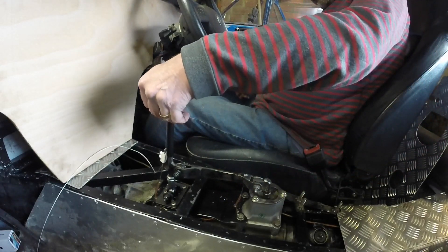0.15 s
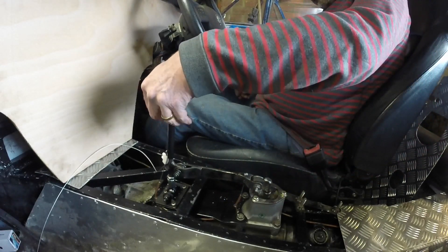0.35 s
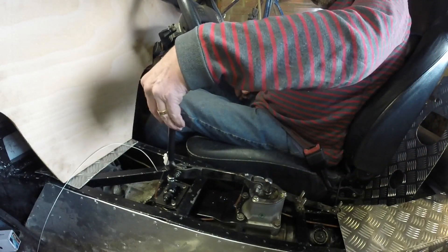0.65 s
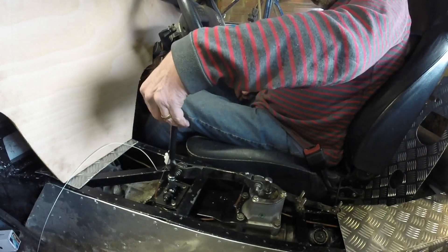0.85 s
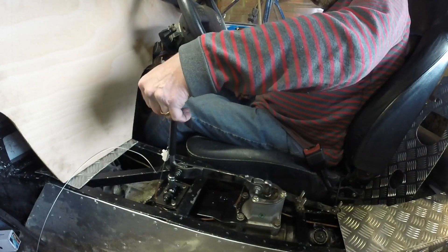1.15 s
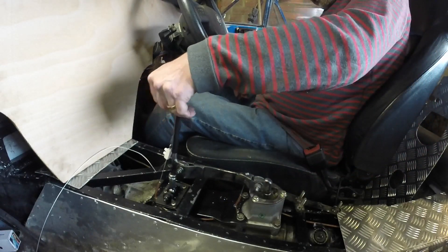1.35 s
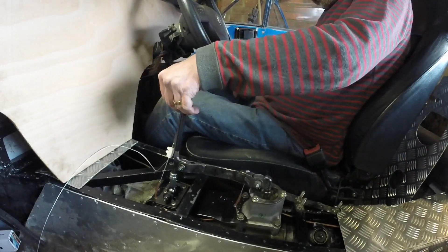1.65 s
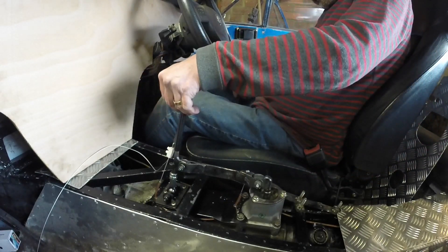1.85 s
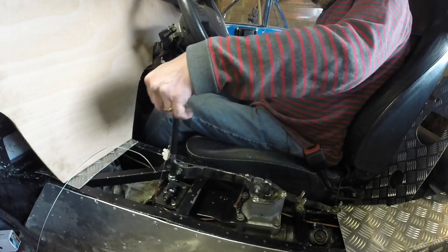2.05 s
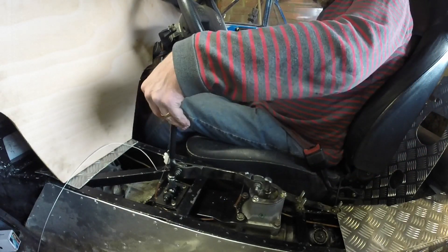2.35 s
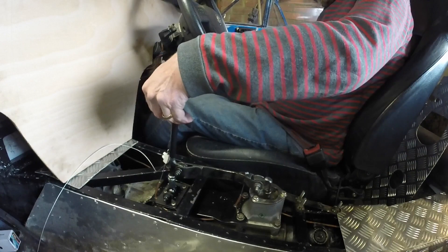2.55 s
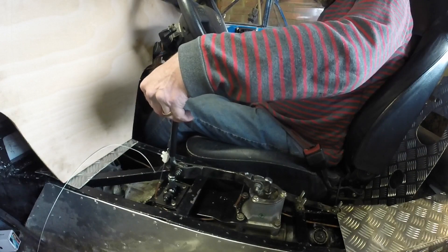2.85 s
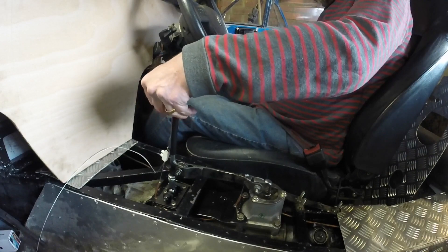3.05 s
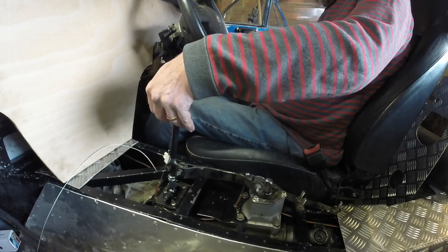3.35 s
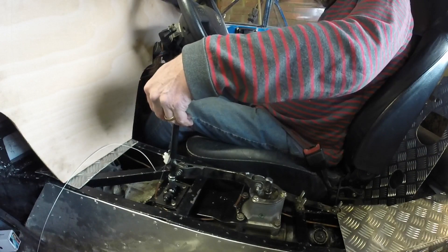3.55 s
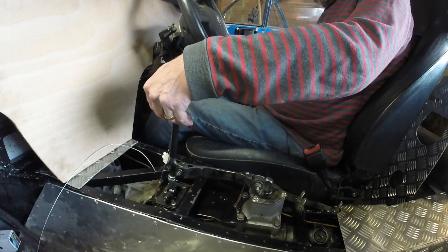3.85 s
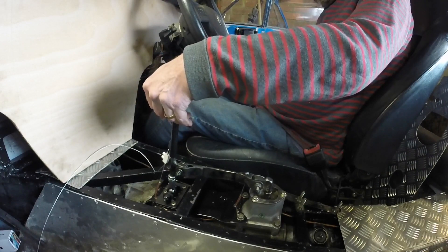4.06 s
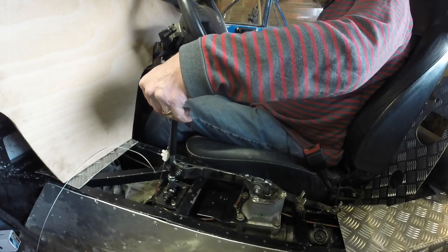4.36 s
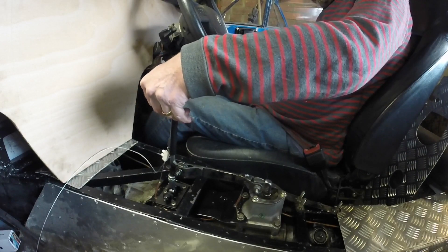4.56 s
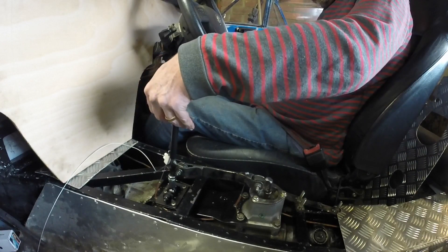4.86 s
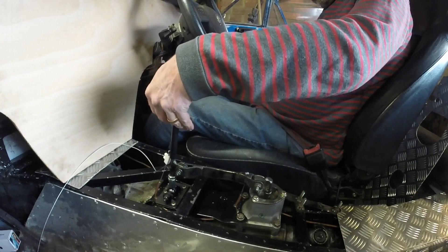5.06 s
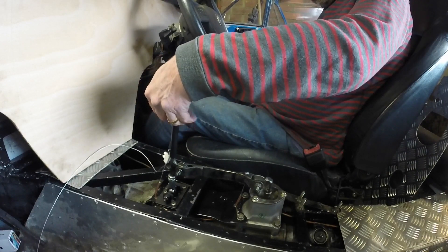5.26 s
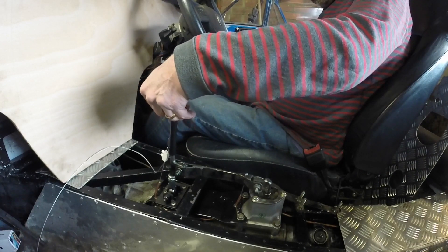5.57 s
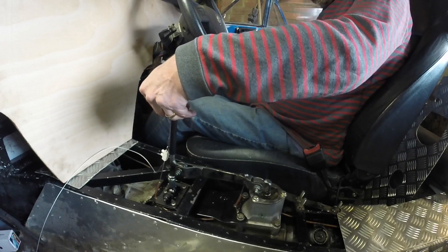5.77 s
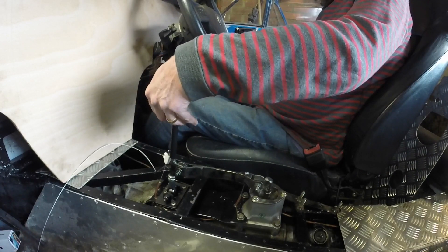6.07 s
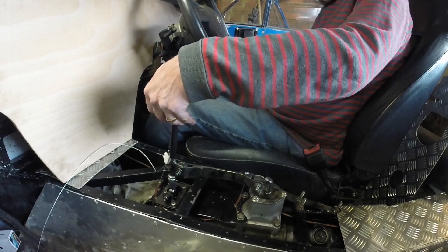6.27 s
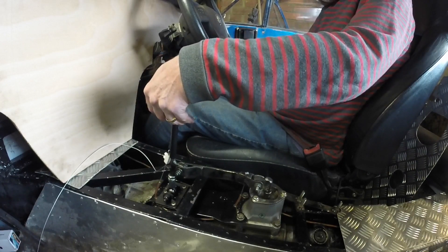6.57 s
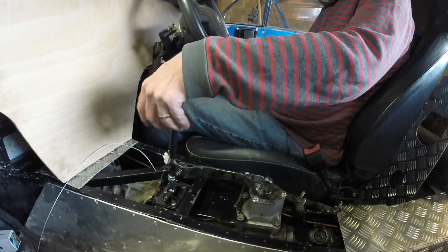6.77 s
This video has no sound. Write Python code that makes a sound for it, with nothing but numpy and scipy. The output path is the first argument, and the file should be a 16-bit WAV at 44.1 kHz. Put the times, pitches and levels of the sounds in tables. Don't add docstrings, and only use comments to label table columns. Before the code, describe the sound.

A car gear lever is worked by hand: metallic clacks, short scraping linkage strokes and deep booming floor thuds in a quiet workshop.

```python
import sys
import numpy as np
from scipy import signal
from scipy.fft import rfft, irfft, next_fast_len
from scipy.io import wavfile
from scipy.ndimage import uniform_filter1d

SR = 44100
rng = np.random.default_rng(int(sys.argv[2]) if len(sys.argv) > 2 else 0)


def dump(signal):
    limited = np.clip(np.atleast_2d(signal).T, -1, 1)
    pcm = np.round(limited * 32767).astype(np.int16)
    wavfile.write(sys.argv[1], SR, pcm)


def level_to_linear(level):
    exponent = np.asarray(level, float) / 20
    return 10 ** exponent


N = 305127


def peak_one(x):
    return x / (np.max(np.abs(x)) + 1e-12)


def add(track, piece, s):
    at = round(s * SR)
    track[at:at + len(piece)] += piece[:len(track) - at]


def ring(force, hz, t60):
    r = level_to_linear(-60 / (t60 * SR))
    w = 2 * np.pi * hz / SR
    return signal.lfilter([0, np.sin(w)], [1, -2 * r * np.cos(w), r * r], force + 1e-18)


def body(force, modes, spread_db, scatter=True):
    chance = rng.standard_normal((len(modes), 2))
    sides = np.sign(chance[:, 1]) if scatter else np.ones(len(modes))
    out = 0
    for (hz, db, t60), c, side in zip(modes, chance[:, 0], sides):
        out = out + side * level_to_linear(db + spread_db * c) * ring(force, hz, t60)
    return out


def crowd(low_hz, high_hz, t60, count):
    ratio = high_hz / low_hz
    return [(low_hz * ratio ** ((k + u) / count), 0, t60) for k, u in enumerate(rng.random(count))]


# f/Hz, level/dB
AIR_COLOUR = [(12, -59), (20, -16.5), (48, 6.5), (70, 0.5), (130, -4), (198, -9), (759, -15), (976, -17),
              (3340, -25.5), (6360, -32), (12100, -42.5), (14700, -45.5), (16000, -70)]


def air(level_db=-53):
    size = next_fast_len(N)
    hz = np.maximum(np.arange(size // 2 + 1) * SR / size, 1)
    f, db = np.array(AIR_COLOUR).T
    colour = level_to_linear(np.interp(np.log(hz), np.log(f), db))
    noise = irfft(rfft(rng.standard_normal(size)) * colour, size)[:N]
    return level_to_linear(level_db) * noise / np.std(noise)


def shop(x, t60_s=0.54, wall_cut_hz=2770):
    out = np.zeros(N)
    dull = np.exp(-2 * np.pi * wall_cut_hz / SR)
    lags = (rng.uniform(.006, .03, 12) * SR).astype(int)
    for k, lag in enumerate(lags):
        loop, state = x.copy(), [0.]
        gain = level_to_linear(-60 * lag / SR / t60_s)
        for i in range(lag, N, lag):
            back, state = signal.lfilter([gain * (1 - dull)], [1, -dull], loop[i - lag:i], zi=state)
            loop[i:i + lag] += back[:N - i]
        out += (loop - x) * (-1) ** k
    for lag in (47, 113):
        gap = np.zeros(lag - 1)
        out = signal.lfilter(np.r_[-.6, gap, 1], np.r_[1, gap, -.6], out + 1e-18)
    return out


# f/Hz, level/dB, t60/s
ROD_MODES = [(2945, 0, .06), (3030, -8, .08), (3165, -3, .07), (3260, -4, .09), (3420, -5, .09),
             (3600, -8, .08), (3725, -6, .08), (3840, -4, .08), (4040, -8, .07), (4156, -8, .07),
             (4300, -10, .07), (4640, -9, .06)]
TUNNEL_MODES = [(555, 2.5, 0.06), (601, 4.5, 0.08), (698.5, 2, 0.12), (760, -6, 0.089), (892, -2, 0.12),
                (997, -9, 0.07), (1116, -10, 0.05), (1366, 2, 0.03)]
GATE_MODES = [(1672, -6, 0.096), (1944, -8.5, 0.13), (2090, -9.5, 0.2), (2253, 8, 0.019), (2360, -3, 0.052),
              (2558, 2.5, 0.05)]
# t/s of greatest speed, length/ms, level/dB, tunnel share/dB
STROKES = [(.421, 54, -45.5, -3), (.976, 52, -50, -1), (1.158, 94, -43.5, -6), (1.327, 20, -68, -15),
           (1.468, 67, -57, 6.5), (2.085, 90, -51, 0), (2.15, 118, -40, -2.5), (2.221, 40, -69, 4),
           (2.295, 82, -41.5, -5.5), (2.978, 93, -52.5, -3), (3.176, 30, -61, -16),
           (3.278, 61, -45.5, -3.5), (3.46, 68, -43, -5.5), (4.27, 61, -58, -5.5), (4.366, 67, -51.5, -16),
           (4.727, 77, -41.5, -1), (5.328, 32, -52.5, -9), (5.603, 66, -51.5, -5), (5.693, 51, -54, -1.5),
           (6.021, 88, -46.5, 1), (6.501, 36, -60, -16), (6.64, 48, -58.5, 3), (6.908, 27, -46, 4)]


def slides(grains_per_s=4000, damping=0.17, bright_db=-6.5, pins_db=-8):
    out, t_ms = np.zeros(N), np.arange(8000) / SR * 1000
    for fastest, length_ms, db, dull_db in STROKES:
        rise_ms = .45 * length_ms
        speed = np.interp(t_ms, [0, rise_ms, length_ms], [0, 1, 0]) ** 1.11
        sizes = level_to_linear(2.7 * np.minimum(rng.exponential(1, len(t_ms)), 3))
        sizes = sizes * rng.choice([-1, 1], len(t_ms))
        grains = (rng.random(len(t_ms)) < grains_per_s / SR) * sizes * speed
        bushes = crowd(4600, 6600, .06, count=20)
        burrs = crowd(6600, 13000, .04, count=24)
        shares = ((ROD_MODES + GATE_MODES, 0), (TUNNEL_MODES, dull_db),
                  (bushes, bright_db), (burrs, bright_db + pins_db))
        for part, share_db in shares:
            damped = [(hz, mode_db / 2, damping * t60) for hz, mode_db, t60 in part]
            rub = body(grains, damped, spread_db=5.0)
            loudest = np.sqrt(np.max(uniform_filter1d(rub ** 2, size=600)))
            add(out, level_to_linear(db + share_db) * rub / loudest, fastest - rise_ms / 1000)
    return out


# f/Hz, level/dB, t60/s
CATCH_MODES = [(5370, -15, .06), (5625, -2, .05), (5690, -6, .06), (5742, -8, .14), (5880, -1, .05),
               (5960, -9, .06), (6250, -17, .05)]
PIN_MODES = [(6650, 0, .05), (7500, -2, .05), (8100, -5, .04), (9300, -8, .04), (12300, -12, .04),
             (13300, -10, .04), (14300, -12, .04)]
PARTS = (ROD_MODES, TUNNEL_MODES, GATE_MODES, CATCH_MODES, PIN_MODES)
# t/s, strength/dB, brightness/dB per octave
SNAPS = [
    (.4573, -15, 2.5),
    (.5088, -17.5, 0),
    (3.2725, -33, -1),
    (6.8763, -17, 2),
]
TICKS = [(.4174, -45.5, 8.5), (1.1512, -34.5, 4.5), (1.4735, -31, -1.5), (2.181, -44, -6),
         (2.2397, -30.5, 0.5), (2.6789, -28, 0.5), (3.1688, -49, -2.5), (3.5182, -48, -2), (4.7115, -44, 0),
         (5.3224, -45.5, 0), (5.6004, -38, 0.5), (6.809, -43, -3.5)]
CLACKS = [(.1022, -11.5, 6.5), (.1052, -7.5, -1), (.9707, -42.5, 0.5), (1.135, -53, 2), (1.3247, -44, 7),
          (2.2823, -47, 0.5), (2.5433, -50, 16), (3.5375, -44.5, 8), (4.2517, -50, 0.5), (5.2909, -48, 13),
          (6.001, -46, 14)]
CLANKS = [(1.4393, -41.5, 0.5), (2.0486, -42.5, -3), (2.1301, -46, -3), (2.154, -31.5, 1.5),
          (2.3101, -20.5, -1.5), (2.645, -43.5, -2.5), (3.2809, -36, -2.5), (4.3534, -50, -2),
          (4.7263, -29.5, 0.5), (5.448, -56, -1), (6.013, -48, 7.5)]
BUMPS = [
    (1.3599, -38.5, -0.5),
    (2.2139, -35, -2),
    (3.4565, -23.5, 5),
    (6.6442, -38, 0.5),
]
SLAMS = [
    (1.4868, -17.5, -2),
    (1.4895, -16.5, 0),
]
# rods level/dB, tunnel level/dB, gate level/dB, catch level/dB, pins level/dB
SNAP_SHARE = (-11, -17.5, -15, 4, -10.5)
TICK_SHARE = (2, -11, -9.5, 3.5, -3.5)
CLACK_SHARE = (-0.5, -22.5, -15, -18, -28)
CLANK_SHARE = (2, -3.5, -1, -5.5, -4)
BUMP_SHARE = (-19, -1, -11, -17, -15.5)
SLAM_SHARE = (1.5, -8, 0, -11, -8.5)


def blows(middle_hz=3400):
    centres = np.array([np.sqrt(part[0][0] * part[-1][0]) for part in PARTS])
    octaves = np.log2(centres / middle_hz)
    kinds = ((SNAPS, SNAP_SHARE), (TICKS, TICK_SHARE), (CLACKS, CLACK_SHARE),
             (CLANKS, CLANK_SHARE), (BUMPS, BUMP_SHARE), (SLAMS, SLAM_SHARE))
    found = []
    for rows, share_db in kinds:
        for s, db, tilt_db in rows:
            found.append((s, *(db + np.array(share_db) + tilt_db * octaves)))
    return sorted(found)


# f/Hz, level/dB, t60/s
CATCH_OVERTONES = [(12340, -31, .06), (13400, -29.5, 0.059), (14200, -26, .06)]


def contacts(chatter_s=0.0016, crack_db=-3, crack_s=0.018, crowd_db=-2, crowd_t60=0.032, lead_s=0.00023):
    out, t = np.zeros(N), np.arange(10000) / SR
    fade = np.cos(np.pi / 2 * t / t[-1])
    for s, *strength_db in blows():
        snap = 1 / (1 + level_to_linear(2 * (strength_db[0] - strength_db[3] - 0.5)))
        for part, db in zip(PARTS, strength_db):
            force = rng.standard_normal(len(t)) ** 3 * .015 * np.exp(-t / chatter_s)
            force[0] = 1
            low, high = part[0][0] * .96, part[-1][0] * 1.03
            noise = rng.standard_normal(len(t)) * np.exp(-t / crack_s)
            band = signal.butter(2, [low, high], "band", fs=SR, output="sos")
            crack = signal.sosfilt(band, noise)
            near = body(force, crowd(low, high, crowd_t60, count=16), spread_db=-0.5)
            loose = level_to_linear(crowd_db) * peak_one(near) + level_to_linear(crack_db) * peak_one(crack)
            own, rest = 1, 1
            if part is PIN_MODES:
                own = .4
            if part is CATCH_MODES:
                own, rest = snap, 1.3 - snap
                sung = body(force, CATCH_MODES + CATCH_OVERTONES, spread_db=-2.5, scatter=False)
                sung = sung * (1 - np.exp(-t / .0004))
            else:
                sung = body(force, part, spread_db=1.0)
            blow = peak_one(own * peak_one(sung) + rest * loose)
            add(out, level_to_linear(db) * fade * blow, s - lead_s)
    return out


# t/s, boom level/dB
GEARS_HOME = [
    (0.4221, -20),
    (2.31, -11.5),
    (3.4586, -11.5),
    (4.7267, -13.5),
    (6.0219, -17),
]
# t/s, boom level/dB, knock level/dB against the boom
LIGHT_SHOVES = [(.106, -30, -10.5), (.728, -47.5, -3.5), (1.148, -33.5, -13), (1.361, -28, -8.5),
                (1.496, -26.5, 3), (2.056, -40.5, 2.5), (2.16, -31.5, -5), (2.205, -35.5, 0),
                (2.268, -35, -12), (2.974, -42, -8), (3.014, -41.5, -10), (3.266, -41, -4.5),
                (4.364, -42.5, -2.5), (5.592, -43, -12), (5.655, -43, -11), (5.689, -39, -16)]


def stops(home_sway_db=-13, home_knock_db=-13, shove_sway_db=-20):
    homes = [(s, db, db + home_sway_db, db + home_knock_db) for s, db in GEARS_HOME]
    shoves = [(s, db, db + shove_sway_db, db + knock_db) for s, db, knock_db in LIGHT_SHOVES]
    return sorted(homes + shoves)


# f/Hz, level/dB, t60/s
PAN_SLOW_MODES = [(43.6, -0.5, 1), (58, -22, 0.94), (77.8, -0.5, 0.74), (96.6, 9.5, 0.48)]
PAN_FAST_MODES = [(107, -12, 1), (126, -43, 0.71), (137.4, 10, 0.28), (133, -8, 0.17), (155, 0.5, 0.45),
                  (176, -37, 0.033)]
# f/Hz, level/dB, t60/s
COVER_MODES = [(232, -8, .1), (255, -7, .2), (274, -1, .24), (293, -1, .22), (335, -5, .2), (370, -6, .16),
               (412, 1, .12), (480, -5, .1)]


def thuds(push_s=0.0094, knock_s=0.00014, knock_lag_s=0.00404, rattle_db=-3, rattle_s=0.023,
          flap_db=-8, flap_s=0.066):
    t = np.arange(30000) / SR
    push = np.sin(2 * np.pi * t / push_s) * (t < push_s) * (0.74 + 0.45 * t / push_s)
    knock = t * np.exp(-t / knock_s)
    panels = signal.butter(2, [210, 750], "band", fs=SR, output="sos")
    sheets = signal.butter(2, [185, 380], "band", fs=SR, output="sos")
    swell = (1 - np.exp(-t / 0.0017)) * np.exp(-t / rattle_s)
    out = np.zeros(N)
    for s, boom_db, sway_db, knock_db in stops():
        boom = peak_one(body(push, PAN_FAST_MODES, spread_db=0.0, scatter=False))
        sway = peak_one(body(push, PAN_SLOW_MODES, spread_db=0.5, scatter=False))
        add(out, level_to_linear(boom_db) * boom - level_to_linear(sway_db) * sway, s)
        rattle = signal.sosfilt(panels, rng.standard_normal(len(t)) * swell)
        cover = peak_one(body(knock, COVER_MODES, spread_db=0.5))
        flap = signal.sosfilt(sheets, rng.standard_normal(len(t)) * np.exp(-t / flap_s))
        cover = cover + level_to_linear(rattle_db) * peak_one(rattle) + level_to_linear(flap_db) * peak_one(flap)
        add(out, level_to_linear(knock_db) * peak_one(cover), s + knock_lag_s)
    return out


def scene(shop_db=-25):
    dulling = signal.butter(1, 6550, fs=SR, output="sos")
    steel = signal.sosfilt(dulling, contacts() + slides())
    return (steel + level_to_linear(shop_db) * shop(steel) + thuds() + air())[None]


def band_limit(x):
    return signal.sosfilt(signal.butter(12, 16390, fs=SR, output="sos"), x)


def record(dry):
    top_cut = signal.cheby2(10, 40, 15600, fs=SR, output="sos")
    return band_limit(signal.sosfilt(top_cut, dry))


dry = scene()
out = record(dry)
dump(out)
```